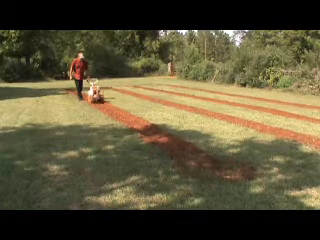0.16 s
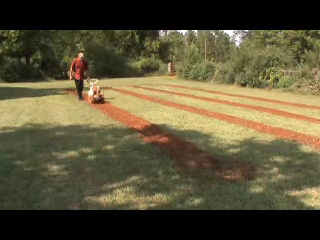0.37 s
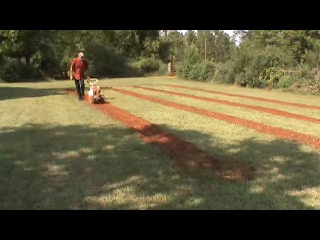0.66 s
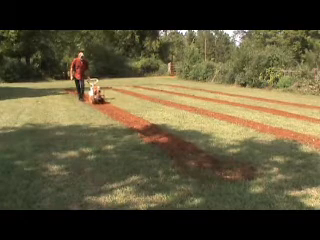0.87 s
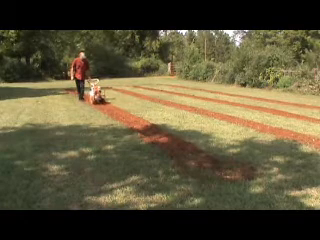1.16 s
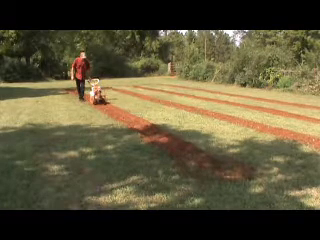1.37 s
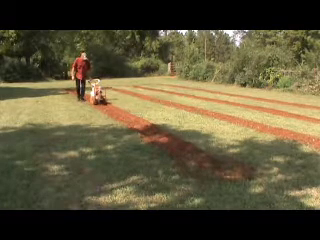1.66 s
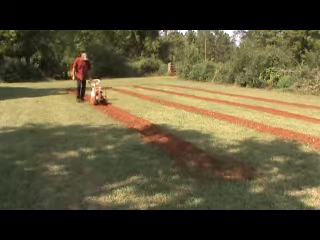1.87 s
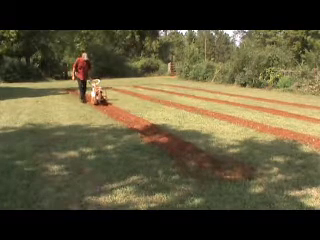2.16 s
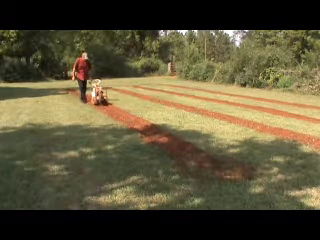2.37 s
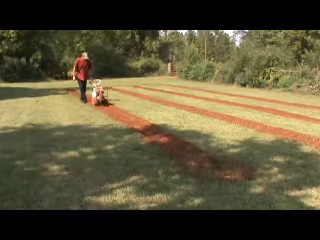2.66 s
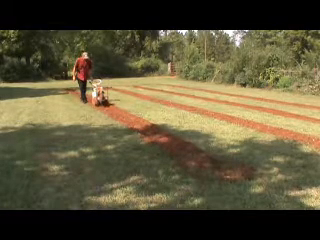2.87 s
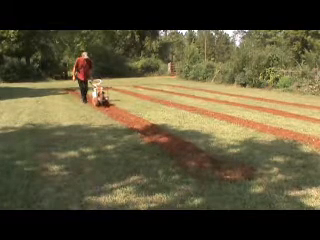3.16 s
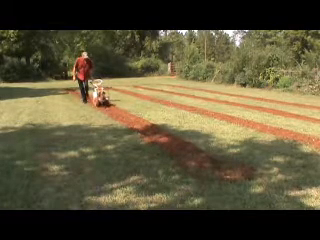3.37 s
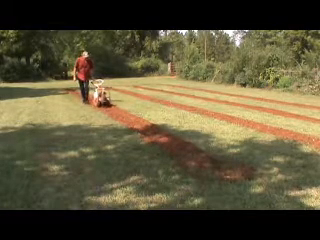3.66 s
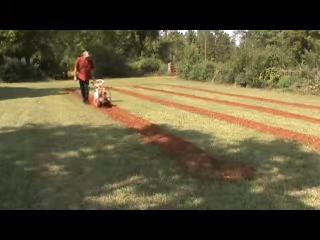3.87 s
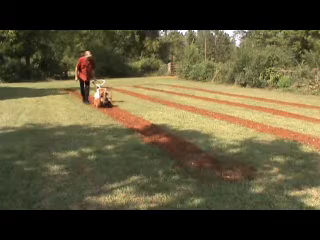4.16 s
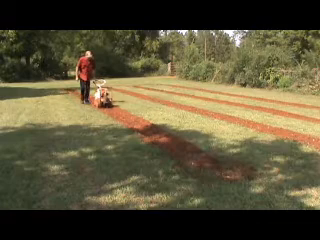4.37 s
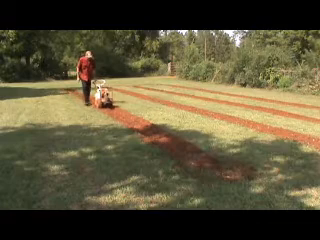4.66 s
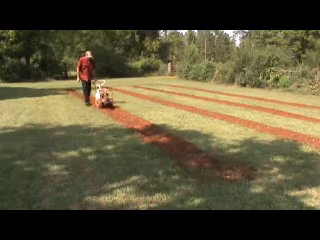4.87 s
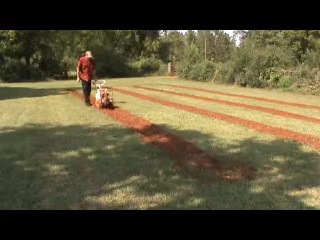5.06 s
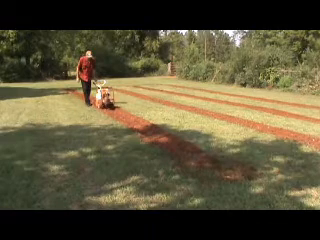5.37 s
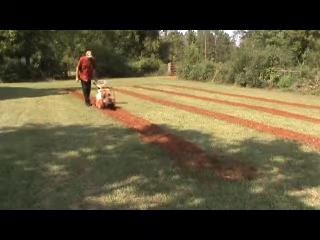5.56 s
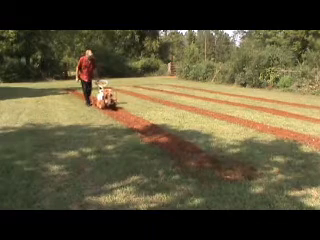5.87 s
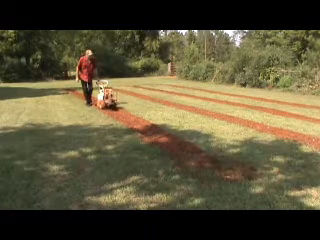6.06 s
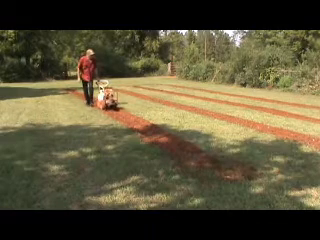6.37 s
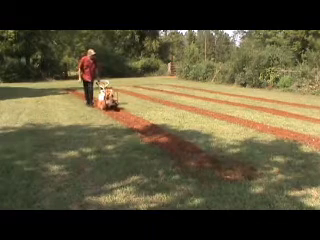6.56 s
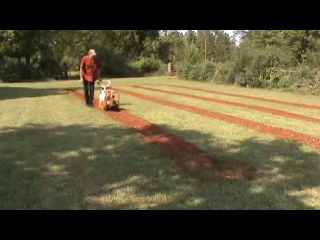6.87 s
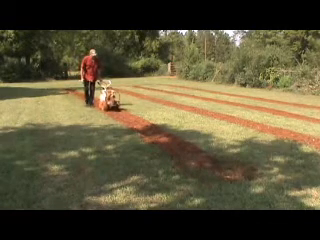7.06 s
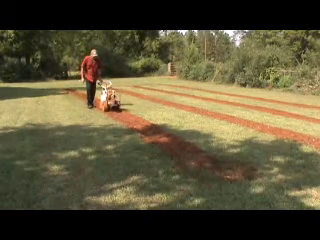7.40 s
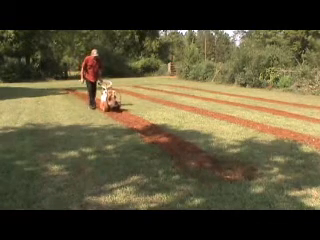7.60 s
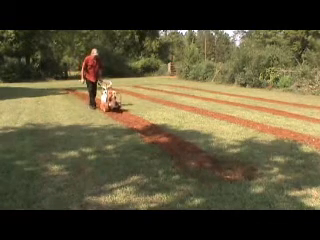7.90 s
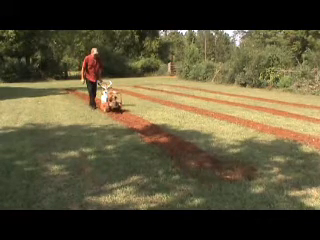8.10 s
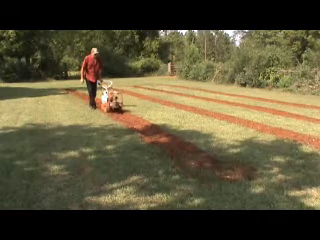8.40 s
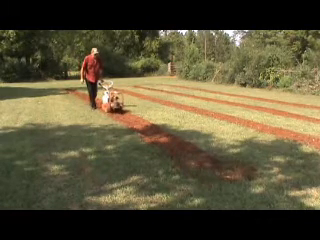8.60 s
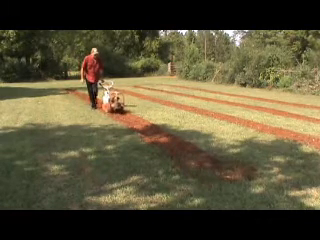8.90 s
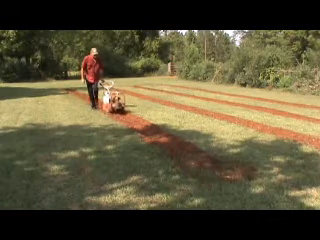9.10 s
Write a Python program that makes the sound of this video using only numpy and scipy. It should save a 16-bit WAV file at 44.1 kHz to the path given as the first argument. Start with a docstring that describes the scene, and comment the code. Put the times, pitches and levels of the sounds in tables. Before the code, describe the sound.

Steady fast chugging of a walk-behind garden tiller under load, clacking and rattling, with soil patter, fine grit hiss and stray stone pings.

```python
"""An open field: a walk-behind garden tiller with a single-cylinder four-stroke engine comes slowly nearer.
Each firing excites resonances: a ping of the cylinder head, knocks of the block and a clack of the casing.
Then the exhaust puff rings the muffler and the intake gulp the air box; noise-driven gears clatter through
the covers, and the tine shield rattles. Random grains make soil and grit, short rings make stones and clods.
A line of trees scatters a little of the sound back, and a light breeze rumbles."""
import sys
import numpy as np
from scipy import signal
from scipy.fft import rfft, irfft, next_fast_len
from scipy.io import wavfile

SR = 44100
rng = np.random.default_rng(int(sys.argv[2]) if len(sys.argv) > 2 else 0)


def dump(signal):
    """Clip the signal to [-1, 1] and save it as 16-bit WAV at the path in sys.argv[1]."""
    limited = np.clip(np.atleast_2d(signal).T, -1, 1)
    pcm = np.round(limited * 32767).astype(np.int16)
    wavfile.write(sys.argv[1], SR, pcm)


N = 407484
TIME = np.arange(N) / SR


def from_db(db):
    """Logarithmic level: 20 dB are a factor of ten in amplitude."""
    return 10 ** (np.asarray(db) / 20)


def rms_one(x):
    """Normalisation: scale to unit root-mean-square."""
    return x / np.sqrt(np.mean(x ** 2) + 1e-20)


def read(rows, at):
    """Linear interpolation: columns of a table, joined by straight lines."""
    key, *columns = np.transpose(rows)
    return [np.interp(at, key, c) for c in columns]


def over_bins(rows, size):
    """Logarithmic frequency scale: columns of a frequency table on the bins of an FFT."""
    hz, *columns = np.transpose(rows)
    bins = np.maximum(np.fft.rfftfreq(size, 1 / SR), 1)
    return [np.interp(np.log(bins), np.log(hz), c) for c in columns]


def colour(x, spectrum):
    """Linear filtering: multiply the spectrum by a broad shape, then scale to rms 1."""
    size = next_fast_len(N)
    gain = from_db(over_bins(spectrum, size)[0])
    return rms_one(irfft(rfft(x, size) * gain, size)[:N])


def butterworth(x, hz, kind):
    """Second-order Butterworth response: flat in the passband with gentle slopes."""
    return signal.sosfilt(signal.butter(2, hz, kind, fs=SR, output="sos"), x)


def lowpass(x, hz):
    """Loss of treble: a gentle two-pole low-pass."""
    return butterworth(x, min(hz, SR / 2 - 1), "low")


def poles(hz, width):
    """Damped oscillator: its recursion and its decay per sample, set by frequency and bandwidth."""
    r = np.exp(-np.pi * width / SR)
    return [1, -2 * r * np.cos(2 * np.pi * hz / SR), r * r], r


def ring(x, hz, width):
    """Impulse response of a damped mode: a unit click starts a decaying sine of initial height 1."""
    return signal.lfilter([0, np.sin(2 * np.pi * hz / SR)], poles(hz, width)[0], x + 1e-18)


def resonance(x, hz, width):
    """Driven resonance: a band-pass with gain 1 at its peak."""
    a, r = poles(hz, width)
    return signal.lfilter(np.array([1, 0, -1]) * (1 - r * r) / 2, a, x)


def clicks(times, db):
    """Impulsive force: one click at each time."""
    at = np.round(np.ravel(times) * SR).astype(int)
    inside = (at >= 0) & (at < N)
    return np.bincount(at[inside], from_db(np.ravel(db))[inside], N)


def scatter(like, spread):
    """Gaussian scatter: one random deviation for each event."""
    return spread * rng.standard_normal(np.shape(like))


def since_last(times):
    """Event phase: seconds since the latest of some events."""
    return np.abs(TIME - times[np.maximum(np.searchsorted(times, TIME) - 1, 0)])


def grains(per_s, spread_db):
    """Random impulse train: clicks of uneven size and either sign at independent moments."""
    sizes = from_db(spread_db * np.minimum(rng.exponential(1, N), 4)) * rng.choice([-1, 1], N)
    return sizes * (rng.random(N) < per_s / SR)


def clumps(per_s, depth_db):
    """Random modulation: a gain that wanders between random levels."""
    steps = rng.standard_normal(1000)
    return from_db(depth_db * np.interp(TIME * per_s, np.arange(len(steps)), steps))


def swells(rows):
    """Cosine-squared envelope: each row swells and fades; one curve in dB for each column of lifts."""
    out = 0
    for s, length, *lifts_db in rows:
        shape = np.cos(np.pi * np.clip((TIME - s) / length, -.5, .5)) ** 2
        out = out + np.outer(lifts_db, shape)
    return out


START_CYCLE = .3266  # share of an engine cycle already run at the start
# Engine speed, which sags as the tines bite. Each row: time in seconds, speed in firings per second.
ENGINE_SPEED = [(0.0, 25.746), (0.6, 25.5), (0.63, 25.867), (1.91, 25.832), (2.09, 25.509), (2.96, 26.078),
                (3.13, 25.397), (3.37, 26.127), (3.62, 25.765), (4.55, 25.701), (5.89, 25.914),
                (6.22, 25.586), (6.46, 25.91), (6.91, 25.428), (7.08, 25.913), (8.12, 25.086),
                (8.22, 25.826), (9.24, 25.498)]


def firings(jitter=.00008):
    """Four-stroke cycle: combustion on every second crank turn; returns its moments and the cycle count."""
    cycles = START_CYCLE + np.cumsum(read(ENGINE_SPEED, TIME)[0]) / SR
    times = np.interp(np.arange(1, int(cycles[-1]) + 1), cycles, TIME)
    times = np.r_[2 * times[0] - times[1], times]  # one firing before the first
    return times + scatter(times, jitter), cycles


REFERENCE_PER_S = 26.88  # firings per second from which load is counted


def engine_load():
    """Load by speed deficit: firings per second below the reference speed."""
    return REFERENCE_PER_S - read(ENGINE_SPEED, TIME)[0]


# Soft firings. Each row: time in seconds, level in dB against a normal firing.
SOFT_FIRINGS = [(.376, -10), (2.473, -1), (2.743, -10), (2.937, -2), (3.519, -13), (4.449, -13),
                (5.495, -2), (5.536, -3), (6.466, -3.5), (6.542, -5), (7.36, -12), (8.731, -7)]


def softness(fired):
    """Weak combustion: how far each firing falls short of a normal one, in dB."""
    s, db = np.transpose(SOFT_FIRINGS)
    return (np.abs(fired[:, None] - s) < .5 / REFERENCE_PER_S) @ db


# Gas resonances of the muffler. Each row: frequency in Hz, bandwidth in Hz, level in dB.
MUFFLER_MODES = [(133.7, 26.1, -2), (147, 240, 0.5)]
# Gas resonances of the intake air box. Each row: frequency in Hz, bandwidth in Hz, level in dB.
AIR_BOX_MODES = [(436.6, 19.3, -15.5), (202.4, 21, -14), (386.7, 10.7, -21), (234.6, 21.5, -19.5),
                 (319, 42, -25.5), (493, 380, -12), (823, 19, -23), (915, 51, -41)]
# Eddies behind the exhaust puff, then the intake gulp.
# Each row: seconds from valve opening to their height, level in dB against the puff.
FLOW_EDDIES = [(0.005, -15.5), (0.0036, -12)]


def gas_flow(fired, burn_db, exhaust_delay=0.00505, intake_delay=0.017, uneven_db=0.27,
             valve_jitter=0.00006, soft_hz=2500, low_hz=38):
    """Pulsed flow: exhaust puff and intake gulp ring their cavities, each trailed by turbulent eddies."""
    out = 0
    paths = zip((exhaust_delay, intake_delay), (MUFFLER_MODES, AIR_BOX_MODES), FLOW_EDDIES)
    for delay, modes, (eddy_s, eddy_db) in paths:
        opens = fired + delay + scatter(fired, valve_jitter)
        age = since_last(opens) / eddy_s
        eddies = rms_one(age * np.exp(-age) * rng.standard_normal(N))
        eddies = eddies * np.sqrt(len(opens) / N)  # as much energy as a unit click per cycle
        puffs = clicks(opens, burn_db + scatter(fired, uneven_db)) + from_db(eddy_db) * eddies
        for k, (hz, width, db) in enumerate(modes):
            out = out + (-1) ** k * from_db(db) * ring(puffs, hz, width)
    radiated = butterworth(out, low_hz, "high")  # steady flow makes no sound
    return rms_one(lowpass(radiated, soft_hz))


def crank_shake(cycles):
    """Rotating imbalance: a sine shakes the frame once a turn, twice a cycle."""
    return np.sqrt(2) * np.sin(2 * np.pi * 2 * cycles)


def tick(fired, burn_db, lead_s=.0006):
    """Coupled resonance: cylinder pressure rings the head in one compact ping per firing, weaker when the
    charge burns softly."""
    ping = ring(clicks(fired - lead_s, burn_db), hz=2415, width=170)
    return rms_one(resonance(ping, hz=2300, width=480))


# Modes of block and cooling fins. Each row: frequency in Hz, bandwidth in Hz, level in dB.
BLOCK_MODES = [(524, 37, -15), (620, 26, -15.5), (807, 45, -19.5), (1110, 42, -9.5), (1267, 51, -10.5),
               (1945, 99, -15.5), (2404, 59, -18), (2540, 120, -15), (3220, 50, -12), (3030, 390, 2.5),
               (3780, 47, -10.5), (4200, 55, -13.5), (4243, 83, -10), (4490, 33, -9), (4830, 50, -7.5),
               (4900, 200, -48), (8570, 60, -3.5)]
# Blows on the block in each cycle: combustion, piston slap, then the valve gear.
# Each row: delay after firing in seconds, level in dB, reach in Hz.
BLOCK_BLOWS = [(.0003, 6.5, 4200), (.0013, -2.5, 8940), (.0078, -4, 4500), (0.0168, 9, 3000)]


def knock(fired, burn_db, uneven_db=1.0, play=.00002):
    """Modal excitation: each blow rings every block mode; soft blows barely reach the high modes."""
    delay, blow_db, reach_hz = np.transpose(BLOCK_BLOWS)
    times = fired[:, None] + delay
    times = times + scatter(times, play)
    out = 0
    for k, (hz, width, db) in enumerate(BLOCK_MODES):
        force_db = blow_db + burn_db[:, None] - 10 * np.log10(1 + (hz / reach_hz) ** 4)
        blows = clicks(times, force_db + db + scatter(times, uneven_db))
        out = out + (-1) ** k * ring(blows, hz, width)
    return rms_one(out)


# Blows that reach the casing in each cycle: combustion, exhaust valve, rocker, intake valve.
# Each row: delay after firing in seconds, level in dB, reach in Hz.
CASING_BLOWS = [(.0002, 0, 9000), (.0072, -4.5, 4400), (.0112, -5.5, 2400), (.0175, -4.5, 1200)]
# Spectral shape of the casing's clack. Each row: frequency in Hz, gain in dB.
CASING_SPECTRUM = [(200, -32), (450, -18), (700, -17), (830, -4), (960, -8), (1120, -2.5), (1500, -1),
                   (1760, -9), (2080, -3), (2270, -8), (2560, -8), (2800, -8), (3300, -2), (3750, -.5),
                   (4000, -7), (4600, 0), (5300, -5), (6000, -7), (8500, -21), (12000, -32)]


def casing(fired, burn_db, soft_db, count=24, width_hz=75, low_hz=700, high_hz=6500):
    """Dispersion: many casing modes each delay the blows a little, for a metallic clack in every cycle."""
    x = 0
    for k, (delay, db, reach_hz) in enumerate(CASING_BLOWS):
        blow_db = db + burn_db + soft_db * (k == 0)  # only the combustion blow softens
        x = x + lowpass(clicks(fired + delay, blow_db), reach_hz)
    places = (np.arange(count) + rng.random(count)) / count
    for hz in low_hz + (high_hz - low_hz) * places:
        a, _ = poles(hz, width_hz)
        x = signal.lfilter(a[::-1], a, x + 1e-18)  # all-pass: delays without changing level
    return colour(x, CASING_SPECTRUM)


# Strength of the mechanical clatter through a cycle. Each row: time after firing in seconds, level in dB.
CLATTER_CYCLE = [(0, -1), (.0005, 3.3), (.0022, 4), (.0045, 1), (.0065, .5), (.0095, 2.6), (.014, -.3),
                 (.020, -.2), (.026, -1.6), (.034, -2), (.037, -4)]
# Spectral shape of the clatter. Each row: frequency in Hz, gain in dB.
CLATTER_SPECTRUM = [(300, -13), (680, -6.5), (1000, -6.5), (1300, -3.5), (1800, -2.5), (2100, 0), (2400, 2),
                    (2800, -5.5), (3400, -5.5), (4050, -9), (5000, -8.5), (6000, -7.5), (8000, -35.5),
                    (12000, -38)]
# Resonances of the engine shroud. Each row: frequency in Hz, bandwidth in Hz, lift in dB before facing.
SHROUD_MODES = [(2390, 320, -3), (2440, 45, 1), (2740, 30, 4), (3050, 67, 1), (2960, 2500, 3)]
# Resonances of the gear case. Each row: frequency in Hz, bandwidth in Hz, lift in dB before facing.
GEAR_CASE_MODES = [(1104, 110, 1.5), (1330, 40, 3.5), (2030, 43, 0), (3690, 42, 1), (3710, 100, 6.5)]
# Which cover faces the listener. Each row: time in seconds, engine shroud in dB, gear case in dB.
COVER_FACING = [(0, 9, -55), (1.6, 7, -14), (3.4, 6, 0), (4.2, 2.5, 3.5), (6.4, 2, 7.5), (9.24, 1.5, 6)]


def clatter(fired, pulsed_above_hz=2300):
    """Random contact excitation: countless small hits of gears and cams ring the covers."""
    pulse = from_db(read(CLATTER_CYCLE, since_last(fired))[0])
    contacts = rms_one(grains(per_s=12000, spread_db=2.0))
    rolling = signal.sosfiltfilt(signal.butter(2, pulsed_above_hz, fs=SR, output="sos"), contacts)
    # dull rolling goes on evenly, hard contacts follow the cycle
    contacts = rolling + pulse * (contacts - rolling)
    rings = 0
    for cover, facing_db in zip((SHROUD_MODES, GEAR_CASE_MODES), read(COVER_FACING, TIME)):
        lifted = sum((from_db(db) - 1) * resonance(contacts, hz, width) for hz, width, db in cover)
        rings = rings + from_db(facing_db) * lifted
    return colour(contacts + rings, CLATTER_SPECTRUM), pulse


# Modes of the tine shield. Each row: frequency in Hz, bandwidth in Hz, level in dB.
SHIELD_MODES = [(1210, 130, -9), (1370, 73, -1.5), (1465, 50, -1.5), (1507, 67, 2), (1620, 370, 5.5)]
# Taps of the shield against its mounts. Each row: delay after firing in seconds, level in dB.
SHIELD_TAPS = [(.0026, -1), (.0107, 1), (.0182, -1), (.022, -4), (.0325, -1)]


def shield(fired, uneven_db=3.0, looseness=0.00076):
    """Modal rattle: the loose tine shield taps its mounts a few times a cycle, never twice alike."""
    delay, tap_db = np.transpose(SHIELD_TAPS)
    times = fired[:, None] + delay
    times = times + scatter(times, looseness)
    out = 0
    for k, (hz, width, db) in enumerate(SHIELD_MODES):
        taps = clicks(times, tap_db + db + scatter(times, uneven_db))
        out = out + (-1) ** k * ring(taps, hz, width)
    return rms_one(out)


# Patches of ground where shield rattle and soil patter grow louder or quieter.
# Each row: time of the height in seconds, length in seconds, shield change in dB, soil change in dB.
GROUND_PATCHES = [(1.4, 0.43, -1, 3), (3.2, 0.53, 1, 0), (4.3, 1, 0.5, 1), (5.8, .4, 3.5, 2),
                  (6.12, 0.32, -0.5, 1), (7.45, 0.33, 1, 2.5), (8.5, .45, 2, -1)]


def ground_patches():
    """Ground forcing: changes of shield and soil level in dB as the tines pass each patch."""
    return swells(GROUND_PATCHES)


# Stones against the tines.
# Each row: start in seconds, level in dB, ring frequency in Hz, ring bandwidth in Hz.
STONE_HITS = [(.527, -17, 2980, 45), (.985, -11, 2030, 60), (1.225, -19, 3060, 45), (2.274, -21, 2080, 73),
              (3.167, -16, 2280, 73), (4.302, -19, 3080, 45), (6.455, -18, 3690, 73),
              (6.921, -14, 3470, 73), (7.996, -15, 3060, 25), (8.042, -18, 3400, 60),
              (8.534, -18, 1990, 73), (8.604, -7, 1890, 110), (8.626, -16, 1700, 73),
              (9.203, -19, 4500, 73)]
# Clods against the shield.
# Each row: start in seconds, level in dB, ring frequency in Hz, ring bandwidth in Hz.
CLOD_HITS = [(4.472, -8, 407.5, 320), (6.917, -5, 426, 320), (7.382, -10, 378, 320), (9.066, -7, 505, 320)]


def stones_and_clods(overtone=1.9, overtone_db=-8):
    """Impact response: each hit is a short ring with one faster-decaying overtone."""
    out = 0
    for s, db, hz, width in [*STONE_HITS, *CLOD_HITS]:
        hit = clicks([s], [db])
        out = out + ring(hit, hz, width) + from_db(overtone_db) * ring(hit, hz * overtone, 2 * width)
    return out


SOIL_DB, SOIL_LOAD_DB = -33.5, 2.5  # level at zero load, lift per firing per second of load
SOIL_SIDEWAYS_DB = -8  # flung soil against the furrow
# Spectral shape of pattering soil. Each row: frequency in Hz, gain in dB.
SOIL_SPECTRUM = [(25, -27), (70, -1.5), (150, 4.5), (260, -1.5), (340, -1.5), (420, 5), (560, -1),
                 (700, -3), (830, -1), (950, 3), (2000, -26), (6000, -59)]


def soil(load, patch_db):
    """Granular impact noise: crumbs patter down in the furrow, and others are flung to the sides."""
    gain = from_db(SOIL_DB + SOIL_LOAD_DB * load + patch_db) * clumps(per_s=6.5, depth_db=0.36)
    furrow, flung = (gain * colour(grains(per_s=2500, spread_db=4.5), SOIL_SPECTRUM) for _ in range(2))
    return furrow, from_db(SOIL_SIDEWAYS_DB) * np.array([flung, -flung])  # opposite polarity is wide


GRIT_DB = 4  # added to the spray levels
# Spectral shape of the grit. Each row: frequency in Hz, gain in dB.
GRIT_SPECTRUM = [(1000, -20), (4000, 0.5), (8000, 5), (11000, 5), (13000, -7.5)]
# Grit that sprays off the tines. Each row: time in seconds, level in dB before GRIT_DB.
SPRAY_LEVEL = [(0.0, -38), (0.56, -36.5), (1.32, -38), (1.55, -37.5), (1.9, -38), (3.52, -38.5), (4.8, -37),
               (5.8, -37.5), (6.92, -36.5), (7.6, -37.5), (9.24, -36.5)]
# Spurts of gravel in the spray. Each row: time of the height in seconds, length in seconds, lift in dB.
GRAVEL_SPURTS = [(.51, .12, 0), (.72, .1, 2.5), (4.85, .1, 4), (6.8, 0.17, 1), (6.92, .09, 4.5),
                 (7.07, .08, 3), (8.02, 0.096, 2), (8.63, 0.047, 5), (9.2, .1, 2)]


def grit(pulse):
    """Dense granular noise: fine grains spray off the tines and surge with each firing."""
    spray = colour(grains(per_s=31000, spread_db=4.5), GRIT_SPECTRUM)
    spray = pulse ** .5 * clumps(per_s=11.0, depth_db=1.36) * spray
    level_db = GRIT_DB + read(SPRAY_LEVEL, TIME)[0] + swells(GRAVEL_SPURTS)[0]
    return from_db(level_db) * rms_one(spray)


# Phase between the microphone ports. Each row: frequency in Hz, lead of the left in radians.
PORT_PHASE = [(50, -.25), (100, -.85), (170, -.92), (350, -1.42), (620, -1.4), (1200, -1.02), (1900, -.84),
              (3700, -.8), (4500, -.15), (6000, -.17), (8000, -.12), (12000, -.04)]
# Level between the microphone ports. Each row: frequency in Hz, left minus right in dB.
PORT_BALANCE = [(60, .9), (98, .8), (160, 0), (430, -.2), (700, -.6), (1150, 1.3), (1870, 1.3), (3060, .1),
                (5010, -1.8), (8000, .1), (13400, 0)]


def at_ports(x):
    """Interchannel difference: two microphone ports hear small shifts of phase and level."""
    size = next_fast_len(N + SR // 10)
    phase, balance_db = over_bins(PORT_PHASE, size)[0], over_bins(PORT_BALANCE, size)[0]
    half = from_db(balance_db / 2) * np.exp(.5j * phase)
    return irfft(rfft(x, size) * np.array([half, 1 / half]), size)[:, :N]


def trees(x, t60=0.26, low_hz=240, high_hz=5400):
    """Diffuse scattering: trunks and leaves return dull decaying echoes, different on each side."""
    lag = np.arange(SR // 2) / SR
    echoes = rng.standard_normal((2, len(lag))) * from_db(-60 * lag / t60) * (lag > .012)
    echoes /= np.sqrt(np.sum(echoes ** 2, axis=1, keepdims=True))
    echoes = butterworth(echoes, [low_hz, high_hz], "band")
    return signal.fftconvolve(x[None], echoes, axes=1)[:, :N]


def breeze(top_hz=55):
    """Uncorrelated wind noise: light air rumbles on each microphone port by itself."""
    air = butterworth(rng.standard_normal((2, N)), 18, "high")
    return rms_one(lowpass(air, top_hz))


START_DISTANCE_M, WALK_M_PER_S = 25.5, .2  # the tiller creeps towards the listener
# levels at the start, before changes by load and ground
EXHAUST_DB, CRANK_DB, KNOCK_DB, TICK_DB = -25, -48.5, -30, -26.5
CASING_DB, GEARS_DB, SHIELD_DB = -28.3, -23.5, -30.5
EXHAUST_LOAD_DB = 1.35  # lift per firing per second of load
EXHAUST_FOLLOWS_GROUND = 0.18  # share of the shield's change that the labouring exhaust takes on
# on the way the gear case turns into view and the cylinder head turns away
GEARS_TURN_DB_PER_S, TICK_TURN_DB_PER_S, CASING_TURN_DB_PER_S = 0.2749, -0.4153, .3


def scene():
    """Inverse-distance law: engine, shield and furrow grow as they near, heard directly and off the trees."""
    nearness = START_DISTANCE_M / (START_DISTANCE_M - WALK_M_PER_S * TIME)
    load = engine_load()
    shield_patch_db, soil_patch_db = ground_patches()
    fired, cycles = firings()
    burn_db = scatter(fired, spread=.45)  # no two charges burn quite alike
    soft_db = softness(fired)
    struck_db = burn_db + soft_db
    gears, pulse = clatter(fired)

    labour = from_db(EXHAUST_LOAD_DB * load + EXHAUST_FOLLOWS_GROUND * shield_patch_db)
    gas = from_db(EXHAUST_DB) * gas_flow(fired, burn_db)
    engine = labour * (gas + from_db(CRANK_DB) * crank_shake(cycles))
    engine += from_db(KNOCK_DB) * knock(fired, struck_db)
    engine += from_db(TICK_DB + TICK_TURN_DB_PER_S * TIME) * tick(fired, struck_db)
    engine += from_db(CASING_DB + CASING_TURN_DB_PER_S * TIME) * casing(fired, burn_db, soft_db)
    engine += from_db(GEARS_DB + GEARS_TURN_DB_PER_S * TIME) * gears

    rattle = from_db(SHIELD_DB + shield_patch_db) * shield(fired)
    furrow, flung = soil(load, soil_patch_db)
    # hits and grit do not grow with nearness
    tiller = nearness * (engine + rattle + furrow) + stones_and_clods() + grit(pulse)
    return at_ports(tiller) + flung + from_db(-10.5) * trees(tiller) + from_db(-58) * breeze()


def record(dry, notch_hz=6500, notch_width_hz=750, notch_depth_db=-25, cutoff_hz=12300):
    """Microphone response: a deep notch in the treble, and a steep cut of the top."""
    b, a = signal.iirnotch(notch_hz, notch_hz / notch_width_hz, fs=SR)
    notched = signal.lfilter(b, a, signal.lfilter(b, a, dry))
    notched = notched + from_db(notch_depth_db) * (dry - notched)  # the notch keeps a floor
    return signal.sosfilt(signal.cheby1(10, .1, cutoff_hz, fs=SR, output="sos"), notched)


dry = scene()
out = record(dry)
dump(out)
```